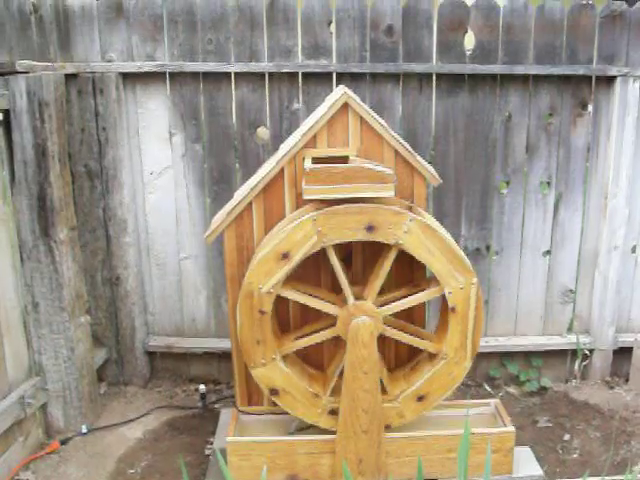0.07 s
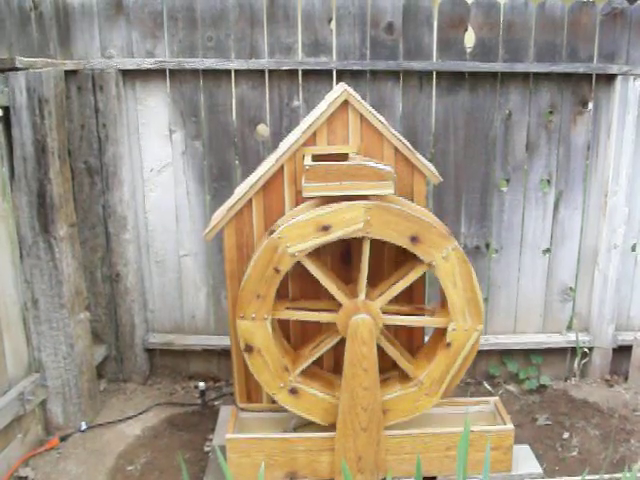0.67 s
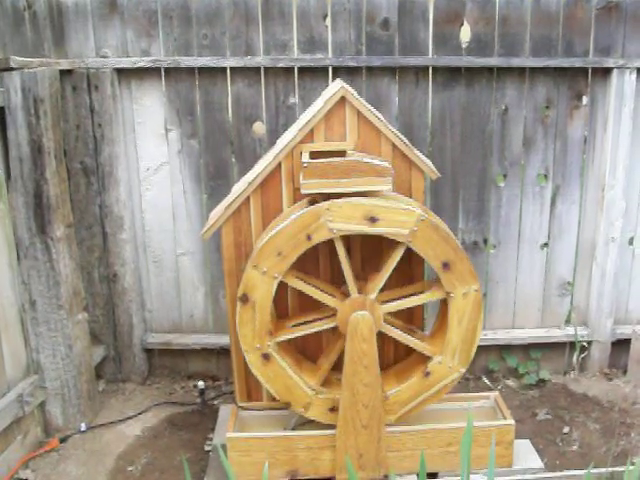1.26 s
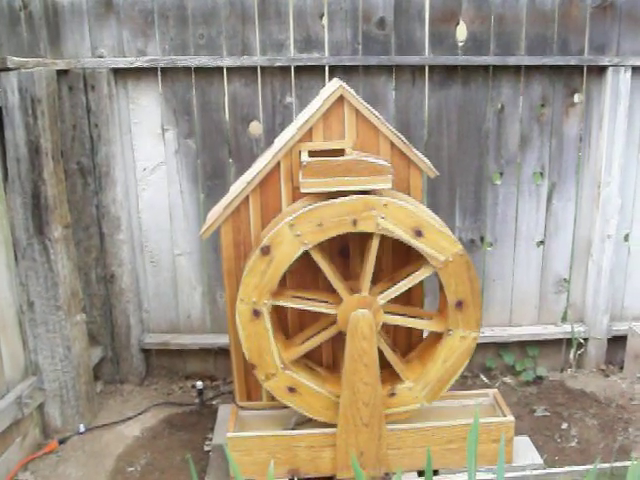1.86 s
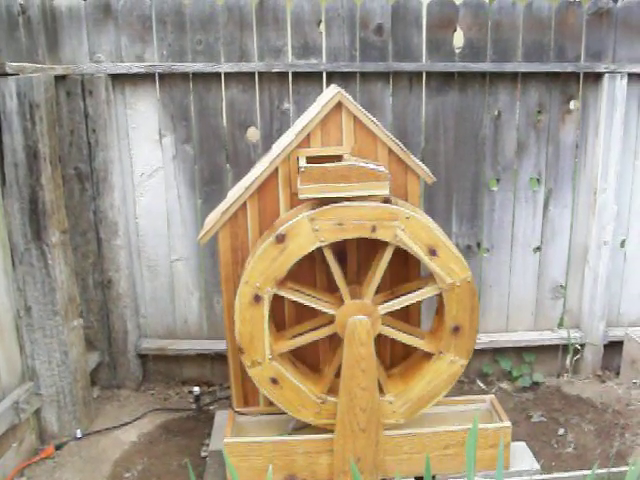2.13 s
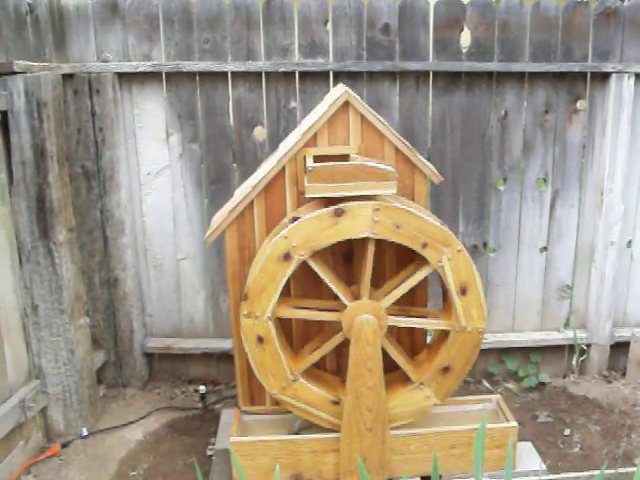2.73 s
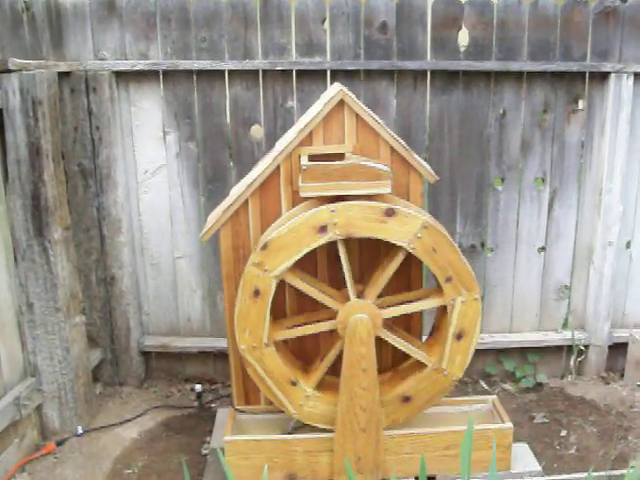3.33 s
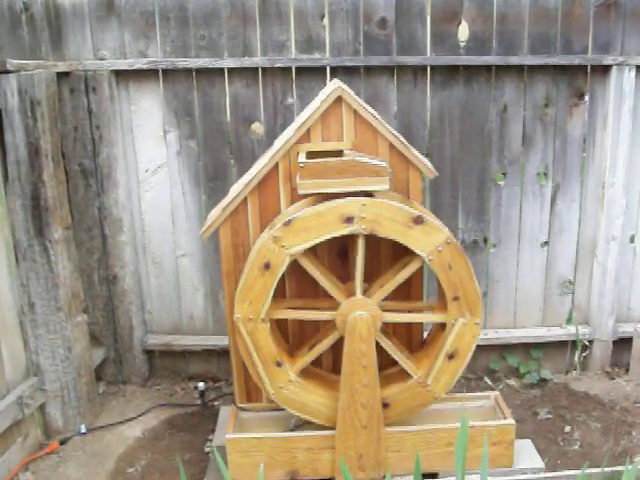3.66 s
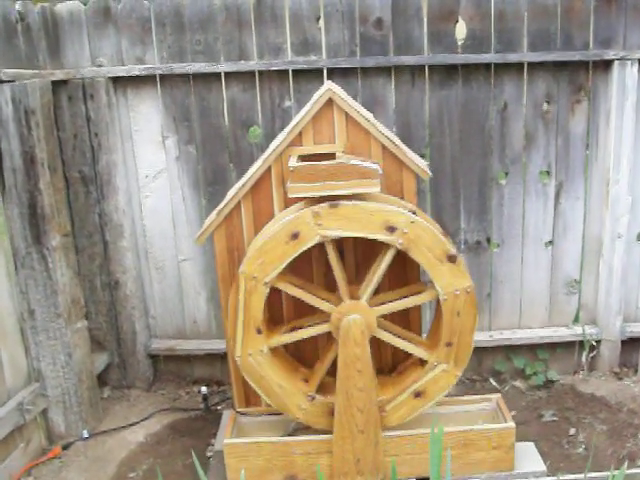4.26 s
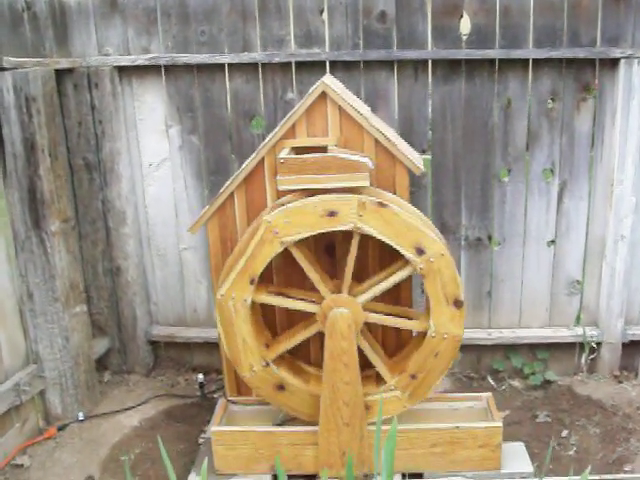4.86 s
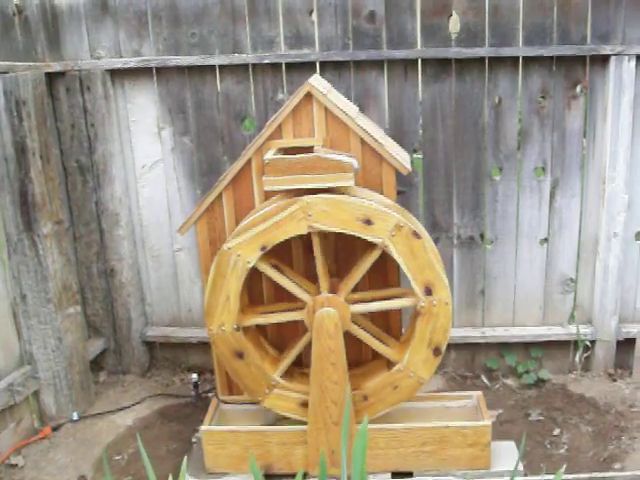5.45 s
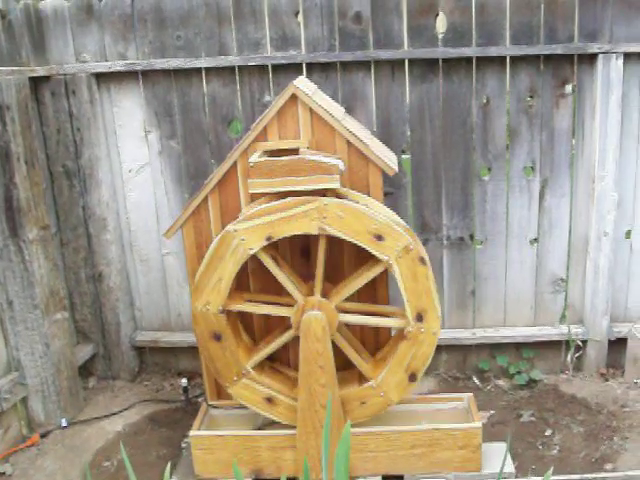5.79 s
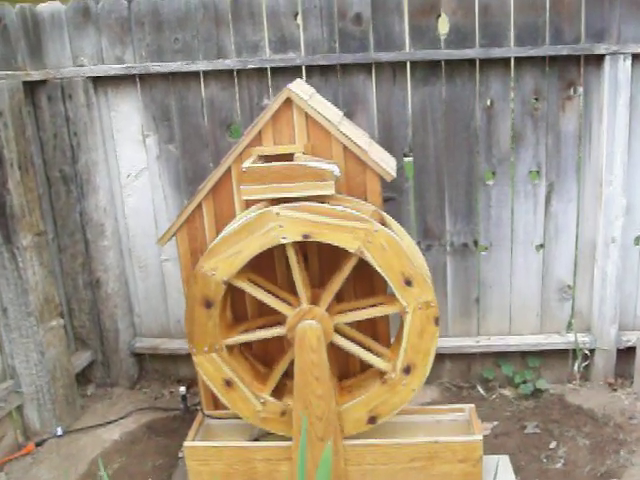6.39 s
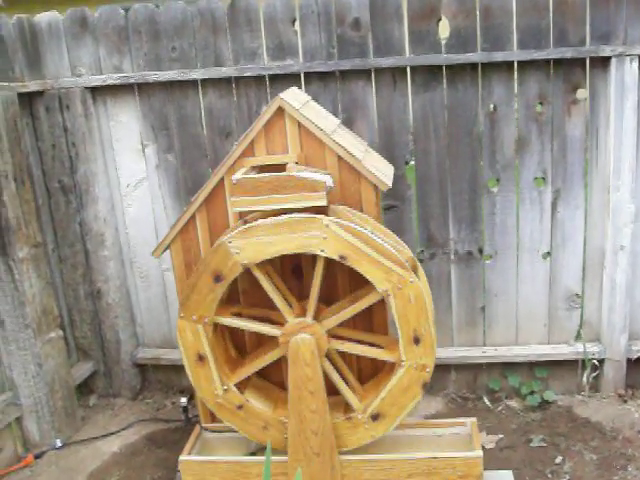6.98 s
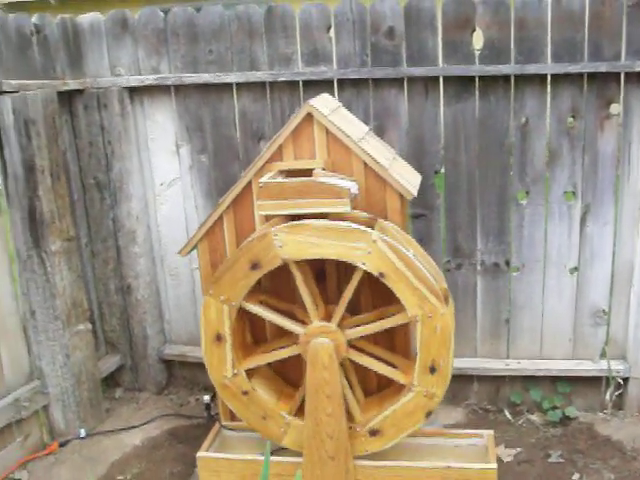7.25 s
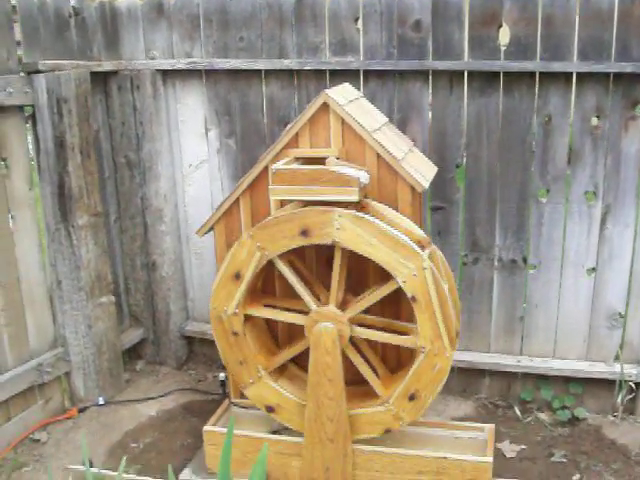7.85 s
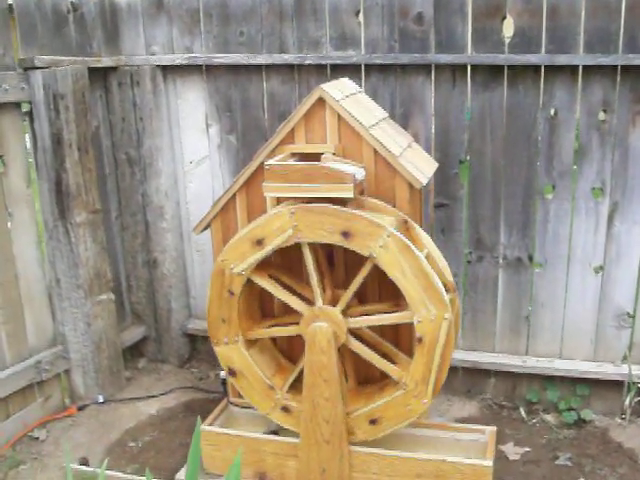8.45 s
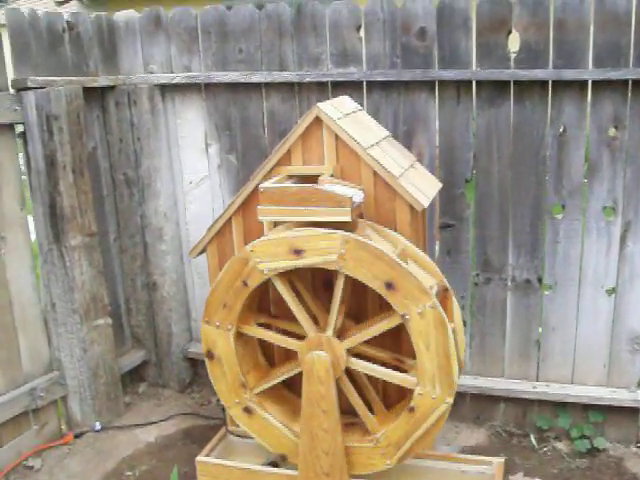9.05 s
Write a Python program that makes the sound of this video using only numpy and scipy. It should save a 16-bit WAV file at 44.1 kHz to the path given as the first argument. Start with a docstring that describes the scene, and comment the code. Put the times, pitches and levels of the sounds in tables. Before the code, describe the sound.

A sharp pop, then water trickles steadily over a small wooden waterwheel, with drips, two distinct knocks and a faint creak.

```python
"""A pop and a brief crackling buzz open the scene. Then a thin stream washes over a small wooden waterwheel in
a fenced yard: drops spatter on the paddles, and drips trap ringing bubbles in the trough. Impacts excite the
modes of the wood as knocks and clacks, and the axle creaks by stick-slip friction. Underneath lie far traffic,
an engine, a bird and a faint hoot, with wind, bumps and hiss at the microphone."""
import sys
import numpy as np
from scipy import signal
from scipy.fft import rfft, irfft, next_fast_len
from scipy.io import wavfile

SR = 44100
rng = np.random.default_rng(int(sys.argv[2]) if len(sys.argv) > 2 else 0)


def to_wav(s):
    """Save 16-bit WAV."""
    ch = np.atleast_2d(s).T  # columns
    pcm = np.round(np.clip(ch, -1, 1) * 32767)  # PCM
    wavfile.write(sys.argv[1], SR, pcm.astype(np.int16))


N = 401751
TIME = np.arange(N) / SR

# spectrum of the microphone's hiss: frequency_hz, density_db
HISS_SPECTRUM = [(100, -0.5), (1000, 5.5), (2000, -0.5), (2800, -0.5), (4000, 1.5), (4900, -1.5),
                 (5400, -5.5), (5800, -17.5), (6200, -35.5)]
# spectrum of wind on the microphone: frequency_hz, density_db
WIND_SPECTRUM = [(4, 5), (20, -0.5), (50, -8), (90, -13.5), (250, -41.5), (1000, -80)]
# gusts on the microphone: middle_s, length_s, level_db
WIND_GUSTS = [(5.58, 0.51, -32.5), (7.18, 0.26, -34), (8.54, 0.6, -31.5), (8.83, 0.29, -34),
              (9.1, 0.17, -30)]
# soft bumps on the camera body: start_s, level_db, pitch_hz, t60_s
BODY_BUMPS = [(0.252, -19.5, 161, 0.0097), (5.53, -26, 60, 0.091), (8.454, -14.5, 151, 0.015)]
# spectrum of far traffic: frequency_hz, density_db
TRAFFIC_SPECTRUM = [(15, -35), (25, -11), (38, 0.5), (59, -0.5), (141, -7), (189, -9), (279, -10.5),
                    (364, -11.5), (418, -13), (508, -16), (700, -18), (910, -44), (1540, -120)]
# a bird's thin whistles: start_s, level_db, length_s
BIRD_WHISTLES = [(0.46, -59, .13), (1.78, -63, .14), (3.93, -57.5, 0.25)]
# spectrum of water running in the trough: frequency_hz, density_db
WASH_SPECTRUM = [(200, -28), (400, -15), (560, -8.5), (730, 3), (900, 2.5), (1030, -0.5), (1150, -5.5),
                 (1500, -7), (1900, -12.5), (2800, -11.5), (3300, -17), (5500, -35.5)]
# level of the stream, strongest at first: time_s, level_db
STREAM_LEVEL = [(1.5, -45.5), (2.2, -47), (4.2, -48.5), (7.7, -47.5), (9, -47)]
# drips that trap a bubble: start_s, level_db, pitch_hz
BUBBLE_DRIPS = [(1.018, -32.5, 1054), (1.344, -34, 1010), (1.81, -39, 1400), (2.819, -34, 2800),
                (4.001, -28.5, 870), (4.014, -40, 1190), (4.07, -40, 1440), (4.650, -34, 2780),
                (5.586, -33, 953), (5.71, -42, 2890), (6.705, -32.5, 2570), (6.89, -41, 1090),
                (7.245, -43.5, 2800), (7.288, -33.5, 973), (8.317, -36.5, 1125), (8.796, -35, 1305),
                (9.085, -36, 1360)]
# short spatters on the paddles, and one longer rasp of the creaking axle at 8.29 s:
# start_s, level_db, pitch_hz, length_s
SPATTERS_AND_RASP = [(0.258, -37, 2390, 0.014), (1.326, -38, 2650, 0.015), (1.691, -39, 4250, 0.022),
                     (1.873, -36, 4840, .004), (2.772, -40, 2800, .015), (3.160, -39, 2620, .01),
                     (3.977, -38, 2530, 0.023), (4.118, -43, 4700, .005), (4.335, -41, 4360, 0.0066),
                     (4.712, -41, 2860, .01), (4.892, -38, 3400, .006), (6.401, -40, 2570, .008),
                     (6.437, -43, 2850, 0.0095), (7.136, -40, 3280, .005), (7.188, -35.5, 3380, .0085),
                     (7.505, -40, 2630, .0055), (7.934, -41.5, 4850, .009), (7.948, -39, 2280, .01),
                     (8.203, -38.5, 2860, .01), (8.29, -40, 2800, 0.058), (8.833, -36, 2600, .03)]
# creaks of the axle: start_s, length_s, level_db
AXLE_CREAKS = [(8.19, .47, -49), (8.65, 0.29, -54.5)]
# modes of a paddle: frequency_hz, level_db, t60_s
PADDLE_MODES = [(2550, 2.5, 0.027), (2926, -0.5, 0.049), (3660, -5, 0.036)]
# hard blows on a paddle: start_s, level_db, pitch_ratio
PADDLE_CLACKS = [(3.010, -31.5, 0.94), (8.854, -27, 1.0)]
# modes of the wooden wheel: frequency_hz, level_db, t60_s
WHEEL_MODES = [(800, 0, 0.021), (983, 1, 0.026), (1260, -13, 0.02), (1473, -13, 0.02),
               (2600, -10.5, 0.0049), (4500, -20, .003)]
# knocks of the wheel on its bearing: start_s, level_db, pitch_ratio
WHEEL_KNOCKS = [(0.253, -32, 1.16), (4.001, -32, 0.9), (4.447, -33, 0.91), (5.3741, -17, 0.96),
                (6.5935, -15.5, 0.95)]


def amp(db):
    """Amplitude grows tenfold with every 20 dB."""
    return 10 ** (np.asarray(db) / 20)


def unit(x):
    """Normalisation to rms 1."""
    return x / np.sqrt(np.mean(x ** 2) + 1e-20)


def add(mix, start_s, sound):
    """Superposition: a sound joins the mix at start_s."""
    part = mix[max(round(start_s * SR), 0):][:len(sound)]
    part += sound[:len(part)]


def colour(x, spectrum):
    """Spectral shaping by a curve of decibels over log frequency; rms 1."""
    hz, db = np.transpose(spectrum)
    size = next_fast_len(N)
    bins_hz = np.fft.rfftfreq(size, 1 / SR)
    gain = amp(np.interp(np.log(bins_hz + 1), np.log(hz), db))
    return unit(irfft(rfft(x, size) * gain, size)[:N])


def drift(top_hz):
    """Random modulation: ten sines of random phase spanning a decade; rms 1."""
    rates_hz = np.geomspace(top_hz / 10, top_hz, 10)
    return unit(sum(np.sin(2 * np.pi * (hz * TIME + rng.random())) / np.sqrt(hz) for hz in rates_hz))


def swell(start_s, length_s, attack_s, release_s):
    """A trapezoidal envelope: linear rise, hold and fall."""
    return np.clip(np.minimum((TIME - start_s) / attack_s, (start_s + length_s - TIME) / release_s), 0, 1)


def resonate(x, hz, width_hz):
    """Forced vibration of a resonator whose natural frequency may move."""
    phasor = np.exp(2j * np.pi * np.cumsum(hz * np.ones(len(x))) / SR)
    pole = np.exp(-np.pi * width_hz / SR)
    return 2 * (phasor * signal.lfilter([1 - pole], [1, -pole], x / phasor + 1e-18)).real


def ring(hz, t60_s, rise_s, glide=0):
    """Damped free vibration with a soft onset; the pitch rises by the fraction glide."""
    t = np.arange(int(t60_s * SR) + 2) / SR
    tone = np.sin(2 * np.pi * hz * t * (1 + glide * t / t60_s / 2))
    return tone * np.exp(-np.log(1000) * t / t60_s) * (1 - np.exp(-t / rise_s))


def microphone(breeze_db=-42, flutter_db=2.5, hiss_db=-51):
    """Turbulence rumbles on the microphone over its noise floor; bumps set the camera body ringing."""
    breeze = amp(breeze_db + flutter_db * drift(top_hz=5))
    gusts = sum(amp(db) * swell(middle_s - length_s / 2, length_s, length_s / 2, length_s / 2)
                for middle_s, length_s, db in WIND_GUSTS)
    wind = np.hypot(breeze, gusts) * colour(rng.standard_normal(N), WIND_SPECTRUM)
    out = wind + amp(hiss_db) * colour(rng.standard_normal(N), HISS_SPECTRUM)
    for start_s, db, hz, t60_s in BODY_BUMPS:
        add(out, start_s, amp(db) * ring(hz, t60_s, rise_s=0.00092))
    return out


def traffic(steady_db=-42.5, vehicle_db=-41, leaves_s=1.8, fade_db_per_s=5):
    """Incoherent sources add in power: steady far traffic and one vehicle that fades as it drives off."""
    vehicle = amp(vehicle_db - fade_db_per_s * np.maximum(TIME - leaves_s, 0))
    return np.hypot(amp(steady_db), vehicle) * colour(rng.standard_normal(N), TRAFFIC_SPECTRUM)


def engine(full_db=-48.5, full_at_s=5.0, swell_db_per_s=1.5, width_hz=18):
    """Narrow-band noise: a far engine's drone swells, then rises in pitch as it speeds up."""
    hz = np.interp(TIME, [7.0, 7.5], [112.4, 120.6])
    db = full_db - swell_db_per_s * np.maximum(full_at_s - TIME, 0)
    return amp(db) * unit(resonate(resonate(rng.standard_normal(N), hz, width_hz), hz, width_hz))


def wavering_tone(hz, waver_hz, top_hz):
    """Frequency modulation: a sine strays at random about its pitch; rms 1."""
    return unit(np.sin(2 * np.pi * np.cumsum(hz + waver_hz * drift(top_hz)) / SR))


def bird():
    """Amplitude modulation shapes one high tone into a bird's whistles, quick to rise, slower to fall."""
    envelope = np.zeros(N)
    for start_s, db, length_s in BIRD_WHISTLES:
        progress = np.linspace(0, 1, int(length_s * SR))
        add(envelope, start_s, amp(db) * np.sin(np.pi * np.sqrt(progress)))
    return envelope * wavering_tone(hz=4677, waver_hz=10, top_hz=77)


def hoot(level_db=-51.5):
    """A nearly pure tone swells once beyond the fence."""
    envelope = amp(level_db) * swell(start_s=5.78, length_s=0.53, attack_s=0.093, release_s=0.28)
    return envelope * wavering_tone(hz=333, waver_hz=3, top_hz=20)


def bubbles(low_hz, high_hz, per_s, t60_cycles, spread_db, sizes=24):
    """Bubble resonance: air pockets form at random, each ringing at the pitch of its size; rms 1."""
    out = np.zeros(N)
    for hz in np.geomspace(low_hz, high_hz, sizes):
        births = np.flatnonzero(rng.random(N) < per_s / sizes / SR)
        impulses = np.zeros(N)
        impulses[births] = amp(spread_db * np.minimum(rng.exponential(1, N)[births], 3))
        out += signal.oaconvolve(impulses, ring(hz, t60_cycles / hz, rise_s=0.00038, glide=0.24))[:N]
    return unit(out)


def stream(wash_gain_db=-0.5, gurgle_gain_db=-10, spray_db=-59, waver_db=0.63):
    """Cavity resonance of the hollow trough colours the wash and its gurgle; fine spray lies above."""
    wash = amp(wash_gain_db + waver_db * drift(top_hz=9)) * colour(rng.standard_normal(N), WASH_SPECTRUM)
    large_bubbles = bubbles(low_hz=597, high_hz=1800, per_s=260, t60_cycles=26, spread_db=3.5)
    gurgle = amp(gurgle_gain_db) * colour(large_bubbles, WASH_SPECTRUM)
    spray = amp(spray_db) * bubbles(low_hz=2160, high_hz=5120, per_s=420, t60_cycles=22, spread_db=2.5)
    flow_db = np.interp(TIME, *np.transpose(STREAM_LEVEL))
    return amp(flow_db) * (wash + gurgle) + spray


def drips(t60_at_1khz_s=0.058, damping_exponent=0.26, second_gain_db=-6):
    """A drip's bubble climbs in resonant frequency as it surfaces; a weaker bubble follows."""
    out = np.zeros(N)
    for start_s, db, hz in BUBBLE_DRIPS:
        t60_s = t60_at_1khz_s / (hz / 1000) ** damping_exponent  # smaller bubbles die sooner
        add(out, start_s, amp(db) * ring(hz, t60_s, rise_s=0.00056, glide=0.11))
        lag, detune = rng.uniform(-1.2, 1, 2)
        second = ring(hz * (1 + 0.21 * detune), t60_s / 2, rise_s=0.0003)
        add(out, start_s + 0.005 * (1 + lag / 2), amp(db + second_gain_db) * second)
    return out


def small_drops(per_s=5, mean_db=-47, spread_db=2, median_hz=2800, spread_octaves=0.34, length_s=0.009):
    """A Poisson process times the small drops; the columns are those of SPATTERS_AND_RASP."""
    starts_s = np.flatnonzero(rng.random(N) < per_s / SR) / SR
    return [(start_s, mean_db + spread_db * size, median_hz * 2 ** (spread_octaves * pitch), length_s)
            for start_s, (size, pitch) in zip(starts_s, rng.standard_normal((len(starts_s), 2)))]


def spatters_and_rasp(taps_per_s=2500):
    """Impulse excitation: quick taps ring a resonance, briefly for a drop, longer for the axle's rasp."""
    out = np.zeros(N)
    t = np.arange(SR // 10) / SR
    for start_s, db, hz, length_s in SPATTERS_AND_RASP + small_drops():
        taps = rng.standard_normal(len(t)) * (rng.random(len(t)) < taps_per_s / SR)
        taps *= np.exp(-(t / length_s) ** 2)
        taps[0] += 2  # a firm first tap
        burst = resonate(resonate(taps, hz, width_hz=hz / 7), hz, width_hz=hz / 3)
        add(out, start_s, amp(db) * burst / abs(burst).max())
    return out


def axle_creak(start_hz=1746, sag_hz_per_s=370, width_hz=340, slips_per_s=66, jitter=0.35, uneven_db=2):
    """Stick-slip friction of the wet axle drives one resonance, which sinks as the wheel turns on."""
    envelope = sum(amp(db) * swell(start_s, length_s, attack_s=0.04, release_s=0.11)
                   for start_s, length_s, db in AXLE_CREAKS)
    hz = start_hz - sag_hz_per_s * np.maximum(TIME - AXLE_CREAKS[0][0], 0)
    slip_count = np.cumsum(slips_per_s * np.exp(jitter * drift(top_hz=54))) / SR
    slips = np.diff(np.floor(slip_count), prepend=0) * amp(uneven_db * rng.standard_normal(N))
    rubbing = 0.45 * rng.standard_normal(N)
    return envelope * unit(resonate(resonate(unit(slips) + rubbing, hz, width_hz), hz, width_hz))


def paddle_clacks():
    """Modal vibration: a paddle struck hard rings brightly at its natural frequencies."""
    out = np.zeros(N)
    for start_s, db, pitch_ratio in PADDLE_CLACKS:
        blow = np.zeros(SR // 10)
        for hz, mode_db, t60_s in PADDLE_MODES:
            add(blow, 0, amp(mode_db) * ring(hz * pitch_ratio, t60_s, rise_s=0.0006))
        add(out, start_s, amp(db) * blow / abs(blow).max())
    return out


def wheel_knocks(echo_delay_s=0.011, echo_gain_db=-19):
    """Impact excites the wheel's modes as it drops against its bearing; the fence reflects an echo."""
    out = np.zeros(N)
    for start_s, db, pitch_ratio in WHEEL_KNOCKS:
        blow = np.zeros(SR // 10)
        for k, (hz, mode_db, t60_s) in enumerate(WHEEL_MODES):
            # neighbouring modes start in antiphase, so the knock swells for a cycle
            add(blow, 0, (-1) ** k * amp(mode_db) * ring(hz * pitch_ratio, t60_s, rise_s=0.39 / hz))
        blow *= amp(db) / abs(blow).max()
        add(out, start_s, blow)
        add(out, start_s + echo_delay_s, amp(echo_gain_db) * blow)
    return out


def scene():
    """Linear superposition of all sources at one microphone."""
    waterwheel = stream() + drips() + spatters_and_rasp() + wheel_knocks() + paddle_clacks() + axle_creak()
    background = traffic() + engine() + bird() + hoot() + microphone()
    return (background + waterwheel)[None]


def record(dry, on_s=0.0362, offset=0.31, held_s=0.24, settle_s=0.15, buzz_hz=78, cutoff_hz=6050):
    """Opening transient: the low-passed input pops, buzzes and crackles, and its offset drains away."""
    waking_db = np.interp(TIME, [0.04, 0.16, 0.25, 0.33, 0.4], [-9.0, -7.5, 2.0, 3.0, 0])
    starting = np.interp(TIME, [0.2, 0.36], [1, 0])
    buzz = signal.sawtooth(2 * np.pi * np.cumsum(buzz_hz * (1 + 0.1 * drift(top_hz=40))) / SR)
    x = dry * amp(waking_db) + 0.018 * starting * buzz
    step = 0.013  # coarse quantisation crackles at first
    x = x + starting * (step * np.round(x / step) - x)
    bias = -offset * np.exp(-np.maximum(TIME - held_s, 0) / settle_s)
    x = (TIME >= on_s) * (x + bias)  # the sudden offset is the pop
    low_pass = signal.firwin(255, cutoff_hz, window=("kaiser", 8), fs=SR)
    return signal.oaconvolve(x, low_pass[None], "same")


dry = scene()
out = record(dry)
to_wav(out)
```